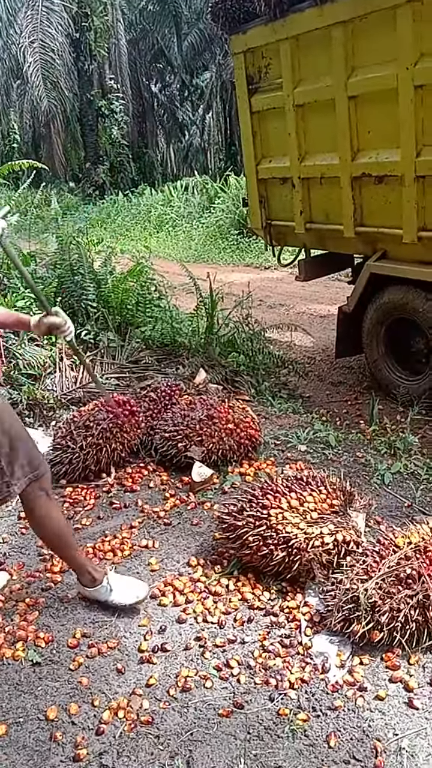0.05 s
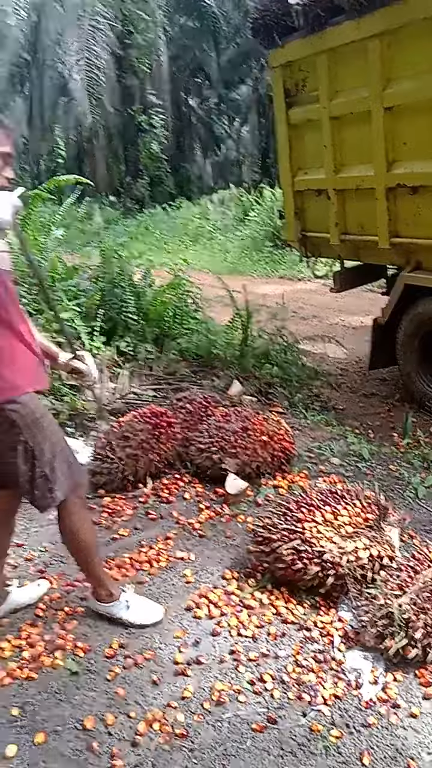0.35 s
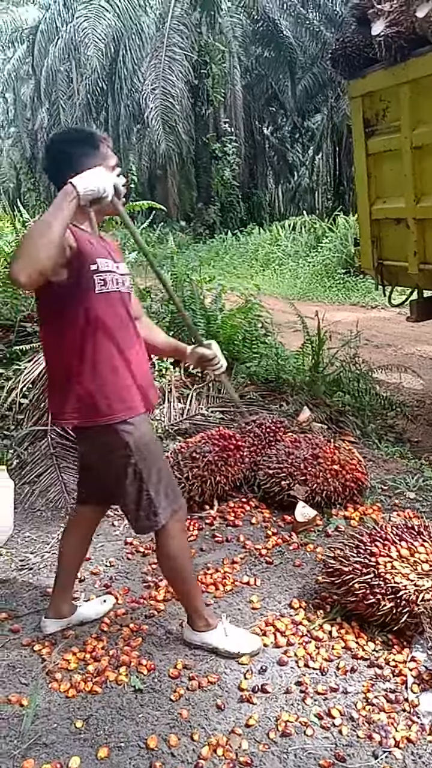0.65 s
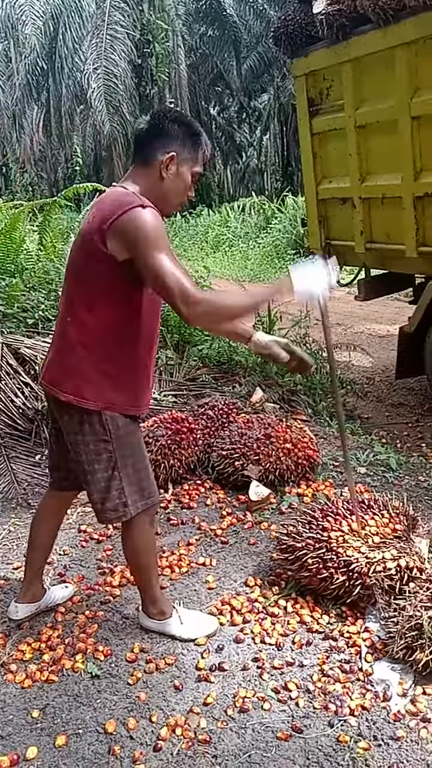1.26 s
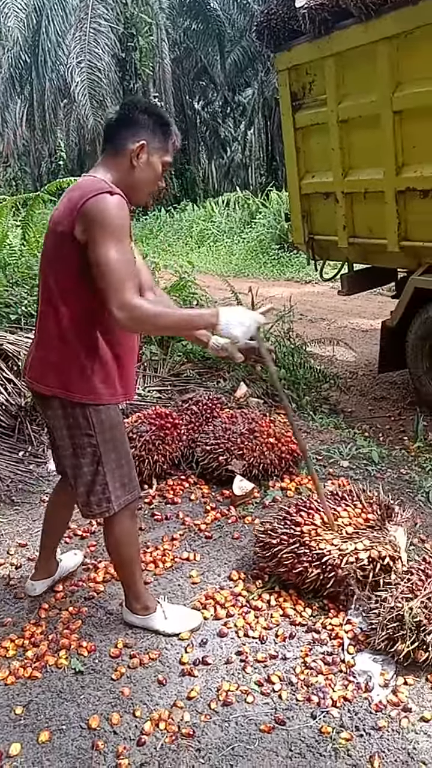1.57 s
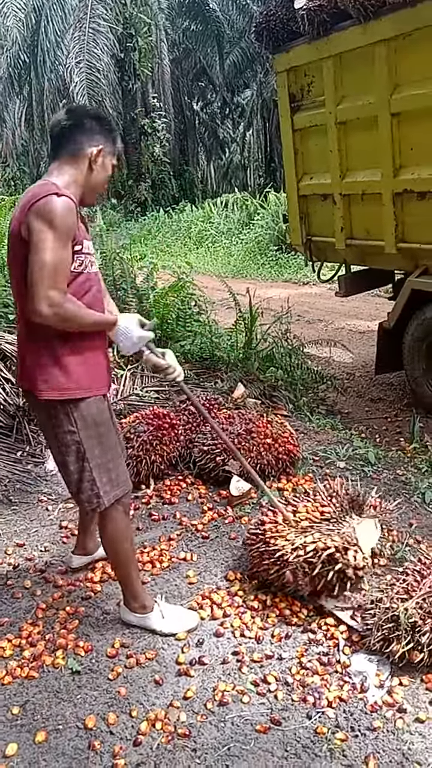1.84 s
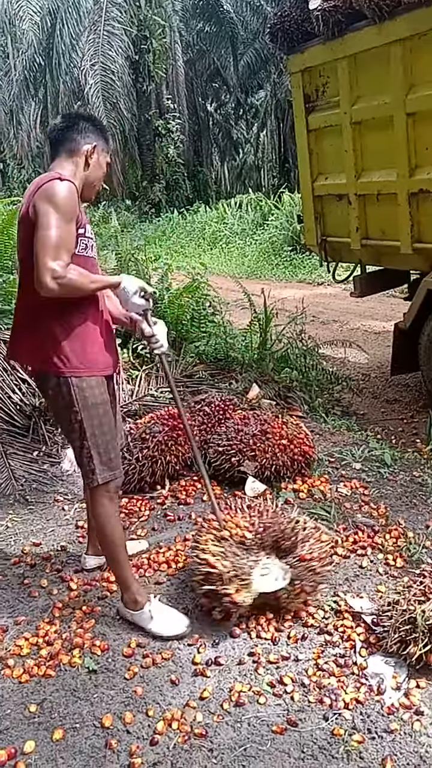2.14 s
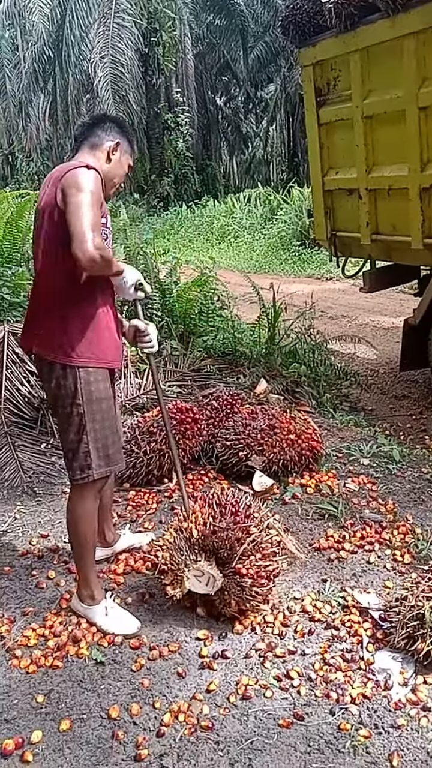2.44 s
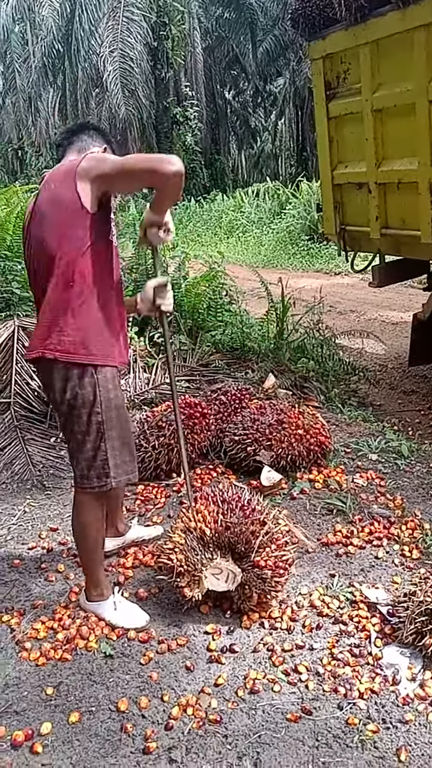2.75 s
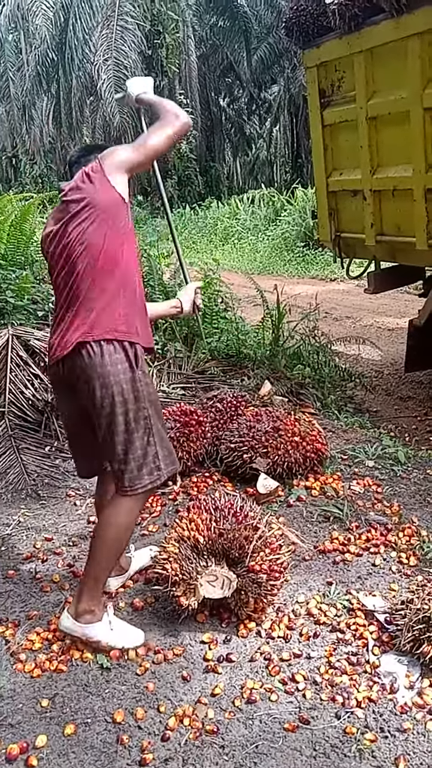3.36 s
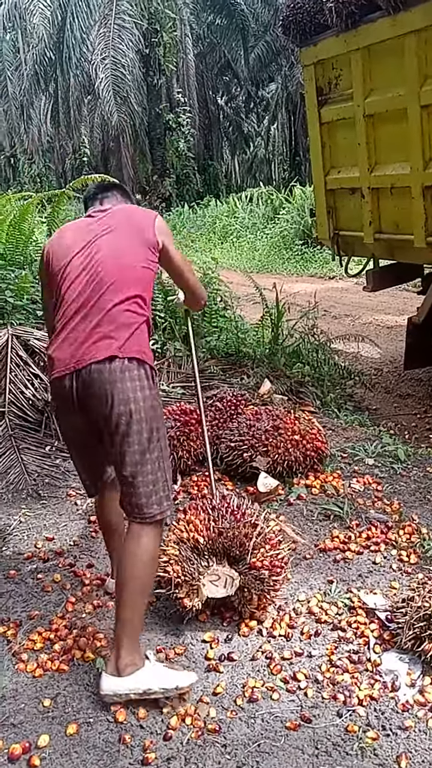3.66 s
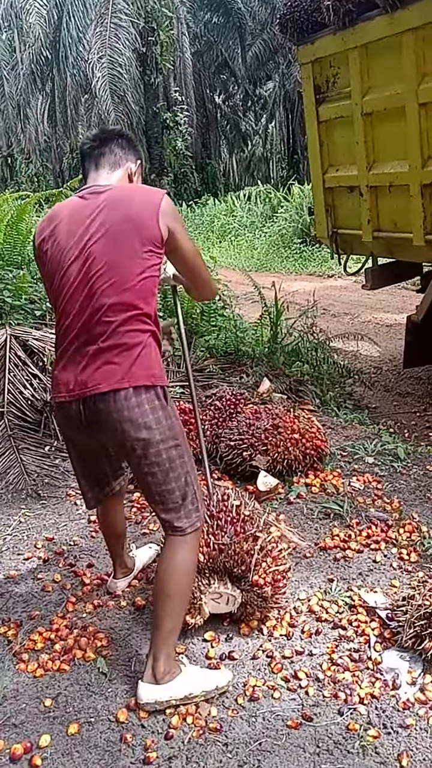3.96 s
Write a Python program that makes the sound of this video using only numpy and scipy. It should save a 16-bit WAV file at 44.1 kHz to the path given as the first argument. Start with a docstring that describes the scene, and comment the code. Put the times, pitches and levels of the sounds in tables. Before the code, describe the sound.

A steel pole stabs a heavy fruit bunch close by at about 1.4 seconds, with a cracking crunch, thud and slight ring. From 2.1 to 2.4 seconds the bunch rolls over grit, crackling and knocking. A louder stab thumps at 3.6 seconds, with a short echo. Shoes scuff softly now and then. High cicadas drone steadily throughout, and faint birds whistle far off in the plantation.

```python
"""In a palm plantation, cicadas drone, far birds whistle and the trees return a short echo.
A steel pole is driven twice into a heavy fruit bunch: fibres crunch, stalks crack, the pole rings,
and the bunch thumps on the ground. Between the blows the bunch is rolled over gritty soil,
its husks rubbing and its spines crackling, and shoes scuff among loose fruit."""
import sys
import numpy as np
from scipy import signal
from scipy.fft import rfft, irfft
from scipy.io import wavfile
from scipy.ndimage import uniform_filter1d

SR = 44100
rng = np.random.default_rng(int(sys.argv[2]) if len(sys.argv) > 2 else 0)


def store_pcm(level_fs):
    """Save levels as 16-bit WAV."""
    pcm = np.round(np.clip(level_fs, -1, 1) * 32767).astype(np.int16)
    wavfile.write(sys.argv[1], SR, np.atleast_2d(pcm).T)


N = 176400
TIME = np.arange(N) / SR

# tone colours of the far noise, the cicada chorus and the quieter insects (f/Hz, level/dB)
FAR_NOISE_COLOUR = [(20, 1), (50, -2.5), (90, 12.5), (130, 5), (200, -1), (450, -4.5), (900, -5.5),
                    (2000, -7), (3700, -8), (9000, -8.5), (10500, -52.5), (15500, -21.5)]
CICADA_COLOUR = [(4300, -65.5), (6150, -30.5), (6600, -15), (7050, -5), (7300, 1.5), (7480, -1),
                 (7800, -1.5), (8080, -6), (8400, -21), (8950, -24), (9500, -42), (10000, -83.5)]
LOW_INSECT_COLOUR = [(3500, -44.5), (4700, -18.5), (5150, -0.5), (5650, 3), (5950, -5), (6400, -22.5),
                     (7500, -60.5)]
# single cicadas nearby (f/Hz, level/dB)
NEAR_CICADAS = [(7480, -46.5), (7780, -47.5)]
# one far bird's whistles (loudest at t/s, f/Hz, level/dB)
WHISTLES = [(.435, 2340, -60.5), (.575, 2350, -69), (1.152, 2326, -59), (1.77, 2277, -62),
            (2.736, 2310, -57.5), (2.874, 2310, -65.5), (3.01, 2300, -70.5), (3.302, 2290, -69),
            (3.5, 2293, -60), (3.6, 2320, -64.5)]
# fainter calls from deeper in the trees (loudest at t/s, length/s, f/Hz, level/dB)
FAR_CALLS = [(.19, .1, 4350, -67), (.24, .08, 2470, -70), (.41, .14, 4330, -69.5), (1.74, .32, 1470, -73),
             (2.08, .18, 2113, -72)]
# strength of the echo from the trees (f/Hz, level/dB)
ECHO_COLOUR = [(100, -28), (300, -18), (900, -20), (2000, -14.5), (5000, -11), (8000, -13.5), (11000, -34)]
# how long the echo lasts (f/Hz, time to fade by 60 dB/s)
ECHO_FADE = [(150, 0.23), (800, 0.4), (3000, 0.29), (8000, 0.27)]
# tone colours of the bunch's body, husks and fibres (f/Hz, level/dB)
BODY_COLOUR = [(40, -43), (110, -37), (170, -5), (225, 5), (320, 3.5), (450, -14), (700, -31.5),
               (2000, -78)]
HUSK_COLOUR = [(150, -36.5), (400, -11.5), (600, -2), (800, 5.5), (1120, 1), (1300, -5.5), (1500, -26),
               (2400, -22.5), (8000, -66.5)]
FIBRE_COLOUR = [(300, -24.5), (1200, -8), (1800, 0), (2600, 1), (3300, -3), (4100, 0.5), (4800, -1),
                (6200, -0.5), (8200, 1), (9500, -16), (11500, -46), (15000, -39)]
# shoes and fruit scuffing the grit (t/s, rise/s, decay/s, body level/dB, husk level/dB, fibre level/dB)
SCUFFS = [(.002, 0.0029, 0.023, -61.5, -53, -40.5), (.618, 0.017, 0.033, -57.5, -56, -45.5),
          (1.954, 0.0033, 0.013, -78, -73, -47.5), (2.459, 0.016, 0.02, -72, -59.5, -58.5),
          (3.02, 0.043, 0.022, -60, -56, -77), (3.839, 0.03, 0.014, -67, -52.5, -57)]
# soles and husks knocking on the ground (t/s, f/Hz, level/dB)
KNOCKS = [(.344, 676, -55.5), (.721, 550, -54.5), (2.165, 790, -38), (2.176, 840, -42), (2.187, 753, -42),
          (2.197, 720, -43), (2.29, 695, -50), (2.311, 710, -46), (2.403, 705, -43.5), (3.021, 697, -39.5),
          (3.07, 690, -40), (3.802, 700, -51), (3.825, 674, -42.5)]
# how hard the rolling bunch presses on its spines (t/s, level/dB)
ROLL_WEIGHT = [(1.55, -35.5), (1.9, -20), (2.06, -20.5), (2.135, -12.5), (2.17, -2.5), (2.22, -2),
               (2.29, 0), (2.36, -3), (2.41, -7), (2.45, -19)]
# tone colours of the rubbing husks, the grit and the tumbling mass (f/Hz, level/dB)
RUB_COLOUR = [(250, -21), (450, -11.5), (720, -1.5), (1100, -7.5), (1450, -11.5), (3000, -49)]
GRIT_COLOUR = [(800, -19.5), (2100, 4.5), (3000, -5), (4000, -3.5), (5500, 3.5), (8000, 11), (10000, -16.5),
               (12000, -39), (15000, -40)]
TUMBLE_COLOUR = [(70, -15), (160, -14), (290, 2.5), (450, -7.5), (800, -45)]
# stalks and dry spines snapping (t/s, centre f/Hz, level/dB)
CRACKS = [(.013, 3500, -39.5), (1.3568, 2100, -19.5), (1.3615, 3600, -14), (1.3658, 3020, -13),
          (1.9493, 3220, -32.5), (2.236, 1570, -32.5), (2.2386, 1590, -37), (2.2582, 3500, -19.5),
          (3.646, 1180, -9.5), (3.8454, 880, -35.5)]
# the bunch thumping under a blow or as it tumbles (t/s, f/Hz, level/dB)
THUMPS = [(.638, 238, -48), (1.3838, 296, -31), (1.3901, 446, -32), (1.371, 198, -38.5),
          (2.268, 293, -47.5), (2.313, 278, -47.5), (3.6391, 231, -24), (3.6618, 249.5, -19.5)]
# the tones of the ringing pole (f/Hz, level/dB, time to fade by 60 dB/s)
POLE_TONES = [(3045, -1, 0.03), (3280, -5.5, 0.1), (3970, -1.5, 0.069)]
# light clinks of the pole (t/s, level/dB)
CLINKS = [(0.615, -40)]
# tearing as the spike goes in (t/s, rise/s, decay/s, body level/dB, husk level/dB, fibre level/dB)
STABS = [(1.349, 0.01, 0.011, -52, -51, -26.5), (1.363, 0.0016, 0.017, -33.5, -37.5, -28.5),
         (3.6289, 0.0098, 0.0037, -36.5, -35.5, -26), (3.6424, 0.00096, 0.0053, -27, -20.5, -16.5),
         (3.653, 0.002, 0.007, -30, -27.5, -21.5), (3.662, 0.016, 0.063, -71, -53, -43)]


def amp(db):
    """Turns decibels into a number to multiply by."""
    return 10 ** (np.asarray(db) / 20)


def unit(x):
    """Scales a signal to an average strength (rms) of 1."""
    return x / np.sqrt(np.mean(x ** 2) + 1e-20)


def look_up(points, hz):
    """Reads between a table's rows, giving each octave equal room."""
    f, value = np.transpose(points)
    return np.interp(np.log(hz + 1), np.log(f + 1), value)


def add(mix, start_s, sound):
    """Mixes a sound in at its start time."""
    part = mix[max(0, round(start_s * SR)):][:len(sound)]
    part += sound[:len(part)]


def colour(x, points):
    """Gives a steady signal a tone colour, at strength 1."""
    gain = amp(look_up(points, np.fft.rfftfreq(len(x), 1 / SR)))
    return unit(irfft(rfft(x) * gain, len(x)))


def drift(hz):
    """A random wobble, up to about hz times a second."""
    damping = 1 + (np.fft.rfftfreq(N, 1 / SR) / hz) ** 4
    return unit(irfft(rfft(rng.standard_normal(N)) / damping, N))


def clicks(t, per_s, spread_db):
    """Tiny breaks of uneven size at random moments."""
    size = amp(spread_db * np.minimum(rng.exponential(1, len(t)), 3))
    return size * rng.choice([-1, 1], len(t)) * (rng.random(len(t)) < per_s / SR)


def swell(t, peak_s):
    """A soft push that grows to 1 and dies away."""
    return (t / peak_s * np.exp(1 - t / peak_s)) ** 3


def far_noise():
    """The distant plantation: a hush that shifts in faint patches."""
    hush = colour(rng.standard_normal(N), FAR_NOISE_COLOUR)
    _, _, bands = signal.stft(hush, SR, nperseg=1024)
    patches = uniform_filter1d(rng.standard_normal(bands.shape), size=9, axis=0)  # smooth over pitch
    patches = unit(uniform_filter1d(patches, size=11, axis=1))  # and over time
    hush = signal.istft(bands * amp(2.5 * patches), SR, nperseg=1024)[1][:N]
    return amp(-66.5 + 0.57 * drift(7.2)) * unit(hush)


def narrow_noise(phase, width_hz):
    """A tone blurred into a thin band of noise."""
    return (np.exp(1j * phase) * (drift(width_hz) + 1j * drift(width_hz))).real


def insects():
    """Many cicadas merge into one throbbing drone; near ones surge, and a quieter kind flutters below."""
    throb_db = 0.86 * np.sin(2 * np.pi * np.cumsum(21.3 + 0.5 * drift(1.1)) / SR)
    lull_db = -3.5 * np.exp(-((TIME - 0.764) / 0.1) ** 2)  # the drone dips briefly
    cicadas = amp(-38.5) * colour(rng.standard_normal(N), CICADA_COLOUR)
    for hz, db in NEAR_CICADAS:
        pitch_hz = hz + 25.18 * drift(7)
        buzz = narrow_noise(2 * np.pi * np.cumsum(pitch_hz) / SR, width_hz=36)
        cicadas += amp(db) * unit(buzz * amp(6 * drift(3)))
    low_insects = amp(-60 + 2.2 * drift(20)) * colour(rng.standard_normal(N), LOW_INSECT_COLOUR)
    return cicadas * amp(throb_db + lull_db) + low_insects


def birds(waver_hz=15, flutter_hz=45, swell_s=0.033):
    """One far bird repeats a fluttering whistle; other calls arrive blurred and broken by the leaves."""
    out = np.zeros(N)
    for s, hz, db in WHISTLES:
        note = np.sin(2 * np.pi * np.cumsum(hz + waver_hz * drift(flutter_hz)) / SR)
        out += amp(db + 2.5 * drift(flutter_hz)) * note / (1 + ((TIME - s) / swell_s) ** 2)
    for s, length, hz, db in FAR_CALLS:
        call = narrow_noise(2 * np.pi * hz * TIME, width_hz=160)
        out += amp(db + 3.5 * drift(flutter_hz)) * call * np.exp(-(2 * (TIME - s) / length) ** 2)
    return out


def tree_echo(sound, rise_s=0.018):
    """The trees scatter a sound back; each pitch fades at its own speed."""
    hz, t, bands = signal.stft(rng.standard_normal(SR), SR, nperseg=256)
    fade_s = look_up(ECHO_FADE, hz)[:, None]
    bands *= amp(look_up(ECHO_COLOUR, hz)[:, None] - 60 * t / fade_s)
    bands *= np.sqrt(2 * np.log(1000) / (fade_s * SR))  # a longer fade adds no energy
    tail = signal.istft(bands, SR, nperseg=256)[1][:SR] * np.minimum(TIME[:SR] / rise_s, 1)
    return signal.fftconvolve(sound, tail)[:N]


def crunch(rise_s, decay_s, body_db, husk_db, fibre_db, puff_s=0.0017):
    """A rush of tiny breaks, each a puff of noise, heard through the bunch's body, husks and fibres."""
    t = TIME[:SR // 4]
    breaks = abs(clicks(t, per_s=6000, spread_db=3.5))
    puffs = signal.lfilter([1], [1, -np.exp(-1 / (puff_s * SR))], breaks)
    grains = puffs * rng.standard_normal(len(t))
    rise = np.sin(np.pi / 2 * np.minimum(t / rise_s, 1)) ** 2
    outline = rise * np.exp(-np.maximum(t - rise_s, 0) / decay_s)
    out = np.zeros(len(t))
    for db, part in [(body_db, BODY_COLOUR), (husk_db, HUSK_COLOUR), (fibre_db, FIBRE_COLOUR)]:
        burst = colour(grains, part) * outline
        out += amp(db) * burst * np.linalg.norm(outline) / np.linalg.norm(burst)
    return out


def footwork():
    """Shoes and loose fruit scuff the grit and knock dully on the ground."""
    out, t = np.zeros(N), TIME[:SR // 10]
    for s, *shape in SCUFFS:
        add(out, s, crunch(*shape))
    for s, hz, db in KNOCKS:
        grit = 0.13 * colour(rng.standard_normal(len(t)), HUSK_COLOUR)
        add(out, s, amp(db) * swell(t, peak_s=0.0025) * (np.sin(2 * np.pi * hz * t) + grit))
    return out


def rolling_bunch(body_lag_s=0.034):
    """The bunch drags, then tips over: husks rub, spines crackle on grit, and its mass follows."""
    weight, late_weight = (amp(np.interp(TIME - lag, *np.transpose(ROLL_WEIGHT), left=-120, right=-120))
                           for lag in (0, body_lag_s))
    grains = clicks(TIME, per_s=1300, spread_db=2.5)
    rub_db = -51 - 19 * np.clip(TIME - 2.33, -0.1, 0.2)  # the rubbing fades during the roll
    rub = amp(rub_db) * colour(grains, RUB_COLOUR)
    grit = amp(-42.5) * colour(clicks(TIME, per_s=2100, spread_db=2), GRIT_COLOUR)
    tumble = amp(-57) * colour(grains, TUMBLE_COLOUR)
    return weight * (rub + grit) + late_weight ** 2 * tumble


def cracks(band_ratio=2.01, splinter_s=0.0025):
    """Stalks and spines break under spike, bunch and shoes: one sharp snap, then splinters."""
    out, t = np.zeros(N), TIME[:SR // 20]
    for s, hz, db in CRACKS:
        snap = t == 0
        splinters = 0.17 * rng.standard_normal(len(t)) * np.exp(-t / splinter_s)
        edges_hz = [hz / band_ratio, min(hz * band_ratio, SR / 4)]
        crack = signal.sosfilt(signal.butter(3, edges_hz, "band", fs=SR, output="sos"), snap + splinters)
        add(out, s, amp(db) * crack / abs(crack).max())
    return out


def thumps():
    """The heavy bunch meets the ground with short, low thuds."""
    out, t = np.zeros(N), TIME[:SR // 4]
    for s, hz, db in THUMPS:
        add(out, s, amp(db) * swell(t, peak_s=0.0045) * np.sin(2 * np.pi * hz * t))
    return out


def steel_pole(ring_db=-25.5, clink_rise_s=0.0053):
    """The spike tears into the bunch, which sets the pole ringing; the pole also clinks lightly."""
    out, t = np.zeros(N), TIME[:SR // 4]
    for s, *shape in STABS:
        add(out, s, crunch(*shape))
    ring = sum(amp(db - 60 * t / fade_s) * np.sin(2 * np.pi * hz * t) for hz, db, fade_s in POLE_TONES)
    out += amp(ring_db) * signal.fftconvolve(out, ring / np.linalg.norm(ring))[:N]
    for s, db in CLINKS:
        add(out, s, amp(db) * ring * np.minimum(t / clink_rise_s, 1))
    return out


def scene():
    """The work close by and its echo, with the plantation all around."""
    work = steel_pole() + thumps() + cracks() + rolling_bunch() + footwork()
    return (work + tree_echo(work) + insects() + birds() + far_noise())[None]


def record(dry):
    """The microphone loses the deepest bass and the highest treble."""
    bass_cut = signal.butter(2, 83, "high", fs=SR, output="sos")
    treble_cut = signal.firwin(511, 15750, window=("kaiser", 9), fs=SR)
    return signal.oaconvolve(signal.sosfilt(bass_cut, dry), treble_cut[None], "same")


dry = scene()
out = record(dry)
store_pcm(out)
```